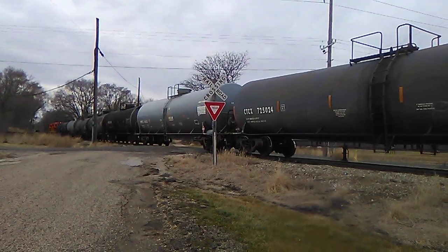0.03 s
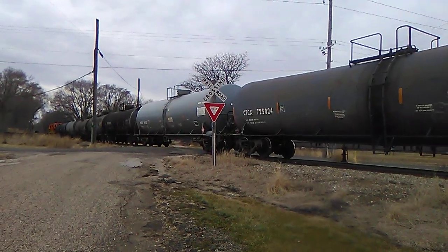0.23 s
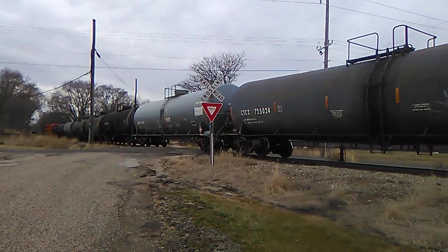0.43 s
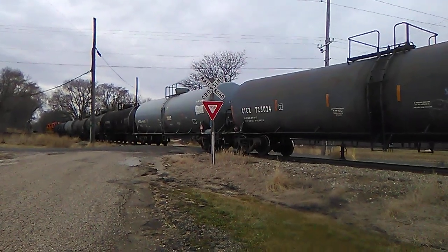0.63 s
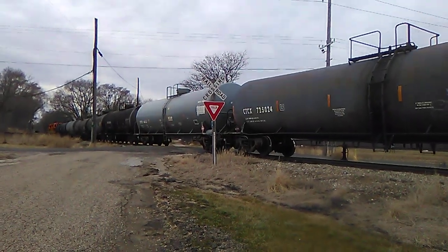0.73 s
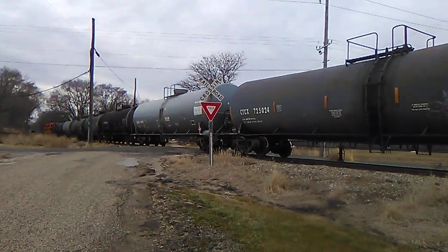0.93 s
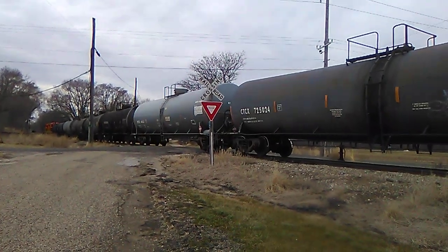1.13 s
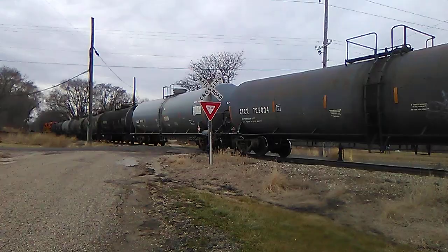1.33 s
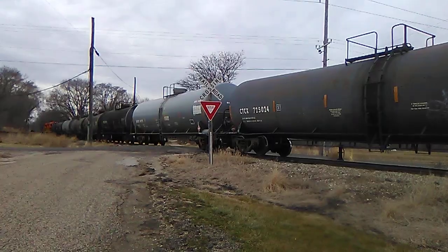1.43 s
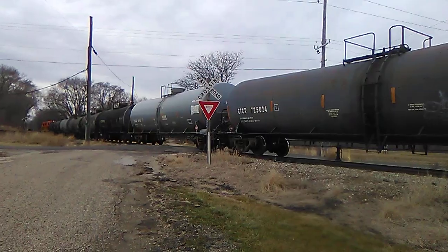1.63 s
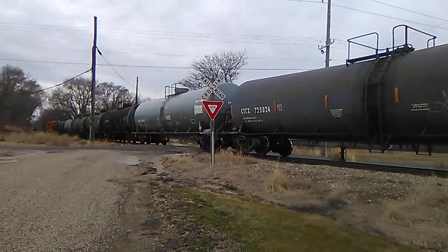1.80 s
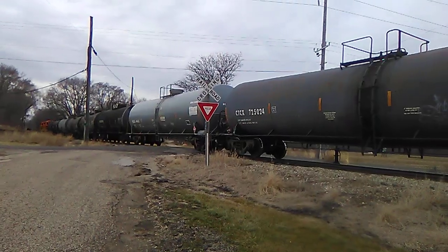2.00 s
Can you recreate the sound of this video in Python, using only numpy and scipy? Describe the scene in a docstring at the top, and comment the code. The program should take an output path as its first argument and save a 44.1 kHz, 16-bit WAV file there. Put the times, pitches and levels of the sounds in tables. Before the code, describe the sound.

Slack runs up a slow train of tank cars. Muffled distant clatter and brief thin squeals give way to dense, bright, ringing coupler crashes nearby, with deep rumble, hollow thuds and wind thumping the left microphone.

```python
"""Wind buffets the left microphone port over a low wheel rumble and brief flange squeals; tank cars roll
slowly over a rural crossing. Then jolted tanks boom, and slack runs up the train: the couplers crash one
after another, mostly nearer and brighter, and the steel rings.
Wind, wheels and crashes are banded noise under envelopes; squeals, booms and ringing are wavering sines."""
import sys
import numpy as np
from scipy import signal
from scipy.io import wavfile
from scipy.ndimage import uniform_filter1d, map_coordinates

SR = 44100
rng = np.random.default_rng(int(sys.argv[2]) if len(sys.argv) > 2 else 0)


def pcm_store(signal):
    """Save signal as 16-bit PCM."""
    levels = np.round(np.clip(np.atleast_2d(signal), -1, 1) * 32767)
    wavfile.write(sys.argv[1], SR, levels.astype(np.int16).T)


N = 90890
TIME = np.arange(N) / SR
EDGES_HZ = np.concatenate([np.geomspace(20, 640, 10, endpoint=False), np.geomspace(640, 15000, 19)])
CENTRES_HZ = np.sqrt(EDGES_HZ[1:] * EDGES_HZ[:-1])


def from_db(db):
    """Amplitude factor of a level in dB."""
    return 10 ** (np.asarray(db) / 20)


def rms_one(x):
    """Scale to rms 1."""
    return x / np.sqrt(np.mean(x ** 2) + 1e-20)


def in_time(rows):
    """Straight lines between (t/s, value) points."""
    return np.interp(TIME, *np.transpose(rows))


def at_hz(points, hz):
    """Read an (f/Hz, value) curve on a log frequency axis."""
    curve_hz, values = np.transpose(points)
    return np.interp(np.log(hz), np.log(curve_hz), values)


def panned(db):
    """Left and right gains of constant power; db is left minus right."""
    pair = from_db(np.array([db / 2, -db / 2]))
    return pair / np.sqrt(np.mean(pair ** 2, axis=0))


def drift(rate_hz):
    """Slow random wander of rms 1: noise through two equal low-pass poles at rate_hz."""
    step = 20  # samples per slow sample
    pole = np.exp(-2 * np.pi * rate_hz * step / SR)
    noise = rng.standard_normal(N // step + 2002)
    slow = signal.lfilter([1], [1, -2 * pole, pole * pole], noise)[2000:]  # drop the settling
    return np.interp(np.arange(N) / step, np.arange(len(slow)), rms_one(slow))


def band_gains(spectrum):
    """Amplitude of each band in a sound of rms 1, from density in dB per Hz."""
    gain = from_db(at_hz(spectrum, CENTRES_HZ)) * np.sqrt(np.diff(EDGES_HZ))
    return gain / np.linalg.norm(gain)


def noise_bands(patchy_db, likeness):
    """Flickering stereo noise, bands x 2 x N; mid and side mix sets left-right correlation."""
    white = rng.standard_normal((2, 2, N))
    bands = []
    for k, hz in enumerate(CENTRES_HZ):
        sos = signal.butter(3, EDGES_HZ[k:k + 2], "band", fs=SR, output="sos")
        mid, side = signal.sosfilt(sos, white[k % 2])
        alike = np.clip(at_hz(likeness, hz), -1, 1)
        stereo = np.sqrt(1 + alike) * mid + np.sqrt(1 - alike) * side * [[1], [-1]]
        bands.append(rms_one(stereo * from_db(patchy_db * drift(6.5))))
    return np.array(bands)


def coloured(spectrum, bands, pan_db=0):
    """Mix the bands to a spectrum and a direction."""
    gains = band_gains(spectrum) * panned(pan_db + 0 * CENTRES_HZ)
    return np.einsum("cb,bcn->cn", gains, bands)


def burst(start_s, rise_s, t60_s):
    """Straight rise, exponential fall."""
    age = TIME - start_s
    return np.clip(age / rise_s, 0, 1) * from_db(-60 * np.maximum(age - rise_s, 0) / t60_s)


# general stereo likeness, also of wheels and far crashes: f/Hz, left-right correlation
LIKENESS = [(280, 0.97), (600, 0.95), (1200, 0.074), (2500, 0.035), (4000, -0.091), (8000, 0.15)]
# wind buffets: centre t/s, half length to 1/e power/s, level before low cut/dB
BUFFETS = [(.01, 0.0092, -5), (0.092, 0.013, -8.5), (0.153, 0.029, -8), (0.232, 0.0058, -6),
           (0.556, 0.0074, -16), (0.774, 0.0085, -14), (0.855, 0.028, -13.5), (1.002, 0.035, -14.5),
           (1.327, 0.024, -10.5), (1.586, 0.0069, -9), (1.724, 0.054, -10.5), (1.905, 0.051, -12.5),
           (2.06, 0.0067, -1.5)]
# wind spectrum before levelling and low cut: f/Hz, relative level/(dB per Hz)
WIND = [(20, -38), (36, 4.5), (52, 6), (75, 11), (115, -5.5), (210, -11), (400, -23.5), (800, -45),
        (14000, -100)]
BREEZE_DB, WIND_LOW_CUT_HZ = -28, 48.5  # breeze level is before the low cut


def wind():
    """Lumps of turbulence at the left microphone port; the right one is sheltered."""
    power = from_db(BREEZE_DB) ** 2
    for centre_s, half_s, db in BUFFETS:
        power = power + from_db(db) ** 2 * np.exp(-((TIME - centre_s) / half_s) ** 2)
    eddies = coloured(WIND, noise_bands(patchy_db=-0.5, likeness=LIKENESS))[0]
    eddies = eddies / np.sqrt(uniform_filter1d(eddies ** 2, size=1500) + 0.0033)  # even out the level
    low_cut = signal.butter(4, WIND_LOW_CUT_HZ, "high", fs=SR, output="sos")
    left = signal.sosfilt(low_cut, np.sqrt(power) * eddies)
    return np.array([left, np.zeros(N)])


# rumble envelope: t/s, level/dB
RUMBLE_LEVEL = [(0, -29.5), (.5, -40), (1.12, -33), (1.2, -29.5), (1.3, -30.5), (1.5, -23), (1.63, -29.5),
                (1.76, -20.5), (1.92, -26.5), (2.06, -21.5)]
# rumble spectrum: f/Hz, relative level/(dB per Hz)
RUMBLE = [(25, -35.5), (50, 8), (75, 6), (130, 4.5), (220, -3.5), (320, -11), (470, -14.5), (600, -38),
          (900, -51.5)]
# steel-on-rail hiss envelope: t/s, level/dB
ROLL_LEVEL = [(0, -51.5), (1.15, -51), (1.4, -36), (1.7, -29.5), (2.06, -29)]
# hiss spectrum: f/Hz, relative level/(dB per Hz)
ROLL = [(300, 0.5), (900, 0), (1200, -2.5), (2100, -0.5), (3400, -10.5), (6000, -12), (9000, -29.5),
        (14000, -63.5)]
# direction of hiss and far crashes: f/Hz, left minus right/dB
FAR_PAN = [(300, 0.5), (1000, -1.5), (2200, -13), (4000, 5), (6000, 4)]
DRONE_HZ, DRONE_WANDER_HZ, DRONE_RE_RUMBLE_DB = 402.3, 11.6, -17.5


def wheels():
    """Surging car rumble with a tank-shell hum, and steel-on-rail hiss swelling as a bogie nears."""
    bands = noise_bands(patchy_db=1.5, likeness=LIKENESS)
    phase = 2 * np.pi * DRONE_HZ * TIME
    hum = drift(DRONE_WANDER_HZ) * np.cos(phase) + drift(DRONE_WANDER_HZ) * np.sin(phase)
    low = coloured(RUMBLE, bands, pan_db=2.5) + from_db(DRONE_RE_RUMBLE_DB) * hum
    rumble = from_db(in_time(RUMBLE_LEVEL)) * low
    hiss = from_db(in_time(ROLL_LEVEL)) * coloured(ROLL, bands, at_hz(FAR_PAN, CENTRES_HZ))
    return rumble + hiss


# wheel squeals: t/s, length/s, start f/Hz, glide/(Hz per s), wander rate/Hz, start level before flutter/dB,
# left minus right/dB
SQUEALS = [(-.03, 0.27, 5950, -13, 170, -47.5, 34), (0.409, 0.05, 4210, -8000, 300, -53.5, 12),
           (0.594, 0.22, 1570, -260, 50, -51, -5.5), (0.883, 0.26, 5560, 0, 130, -59, 17),
           (1.338, 0.05, 6760, 11, 34.8, -32.5, -9), (1.698, 0.058, 949, -2800, 30, -22.5, -2),
           (1.815, 0.05, 7140, -3.5, 40, -30, 10)]
SQUEAL_RISE_S, SQUEAL_FALL_S = 0.004, 0.015
SQUEAL_FADE_DB, SQUEAL_FLUTTER_DB = -6.5, 4  # fade over the whole length; flutter rms
CHATTER_RADIANS = .9  # rms phase wander of squeals and ringing


def squeals():
    """Flanges rub and a wheel mode sings with an unsteady pitch, fading as it goes."""
    out = 0
    for start_s, length_s, hz, glide, wander_hz, db, pan_db in SQUEALS:
        age = np.clip(TIME - start_s, 0, length_s)
        gate = np.clip(np.minimum(age / SQUEAL_RISE_S, (length_s - age) / SQUEAL_FALL_S), 0, 1)
        phase = 2 * np.pi * np.cumsum(hz + glide * age) / SR + CHATTER_RADIANS * drift(wander_hz)
        tone = np.sqrt(2) * np.sin(phase) * from_db(SQUEAL_FLUTTER_DB * drift(wander_hz))
        level = from_db(db + SQUEAL_FADE_DB * age / length_s)
        out = out + level * gate * tone * panned(pan_db)[:, None]
    return out


# thuds of lurching cars: t/s, level/dB, start f/Hz, left minus right/dB
THUDS = [(0.346, -24, 81.4, -25), (0.635, -27, 161.1, 16), (1.18, -22.5, 141.4, -2),
         (1.322, -19.5, 181.3, 7), (1.448, -20, 271, 3.5), (1.7, -20.5, 234.4, -1)]
THUD_RISE_S, THUD_T60_S = 0.006, 0.42
THUD_WANDER_HZ, THUD_SAG_OCT_PER_S = 13.7, 7


def thuds():
    """A jolted tank booms briefly, its unsteady pitch sliding down as it settles."""
    out = 0
    for start_s, db, hz, pan_db in THUDS:
        pitch_hz = hz * 2 ** (-THUD_SAG_OCT_PER_S * np.maximum(TIME - start_s, 0))
        phase = 2 * np.pi * np.cumsum(pitch_hz) / SR + drift(THUD_WANDER_HZ)
        boom = burst(start_s, THUD_RISE_S, THUD_T60_S) * np.sqrt(2) * np.sin(phase)
        out = out + from_db(db) * boom * panned(pan_db)[:, None]
    return out


# coupler crashes: t/s, level at 2 kHz tilt pivot/dB, rise/s, t60/s, nearness 0-1, tilt/(dB per octave),
# lower ring f/Hz, upper ring f/Hz
CRASHES = [(0.481, -37.5, 0.054, 0.67, 0.03, -1, 2840, 5600),
           (0.888, -39, 0.022, 0.73, 0.05, -3.5, 945, 1570), (1.097, -40.5, 0.017, 1, 0, 1, 2250, 3700),
           (1.167, -25, 0.032, 0.57, 0.05, -0.5, 1000, 2380),
           (1.326, -25.5, 0.017, 0.96, 0.04, 0, 838, 7150),
           (1.426, -19, 0.042, 0.75, 0.1, -0.5, 1570, 1860),
           (1.593, -24.5, 0.035, 0.16, 0.58, -1, 2250, 3682), (1.689, -20, 0.025, 1, 0.08, 0, 832, 1570),
           (1.744, -10.5, 0.027, 0.33, 0.88, 1.2, 1814, 3780),
           (1.896, -15, 0.0063, 0.26, 1, 2.3, 2380, 5545), (1.963, -16.5, 0.0018, 0.22, 1, 2.5, 1887, 4900),
           (1.981, -17, 0.0032, 0.21, 1, 2, 3300, 5440), (2.029, -19, 0.02, 0.36, 0.74, -0.5, 3280, 7150)]


def crash_shapes():
    """One envelope for each crash."""
    return np.array([burst(start_s, rise_s, t60_s) for start_s, _, rise_s, t60_s, *_ in CRASHES])


# crash spectra before tilt: f/Hz, relative level/(dB per Hz)
FAR_CRASH = [(150, -1.5), (250, -1), (400, -0.5), (620, -20), (950, -3), (1220, -11.5), (1750, -9.5),
             (2600, -11), (4700, -17), (6000, -14), (8500, -27.5), (11000, -57)]
NEAR_CRASH = [(150, -10), (300, 0.5), (800, 1.5), (1230, -12), (1900, -2.5), (2350, -2), (2850, -4),
              (3500, -7), (4400, -11.5), (5600, -9.5), (8300, -20), (10300, -33.5), (14000, -42.5)]
# direction of near crashes and ringing: f/Hz, left minus right/dB
NEAR_PAN = [(300, -4.5), (1000, 1.5), (2200, -5), (4000, 4), (6500, 11.5), (12000, 5.5)]
# near-crash stereo likeness: f/Hz, left-right correlation before the lag
NEAR_LIKENESS = [(300, 0.95), (750, 0.96), (1500, 1), (2500, 0.64), (6000, 0.36)]
NEAR_LAG_S = .00056  # a near crash reaches the right port later
CRASH_PATCHY_DB, RATTLE_DB, RATTLE_HZ = 1.2, 0.48, 224


def crashes():
    """Each crash is a dense rattle that dies away; nearness sets its colour and direction."""
    _, db, _, _, near, tilt, *_ = np.transpose(CRASHES)
    near = np.clip(near, 0, 1)
    shapes = crash_shapes()

    def rattle(share, spectrum, pan, likeness):
        """Add the powers of all crashes band by band."""
        gains = band_gains(spectrum) * panned(at_hz(pan, CENTRES_HZ))
        bands = noise_bands(CRASH_PATCHY_DB, likeness) * gains.T[:, :, None]
        out = 0
        for band, hz in zip(bands, CENTRES_HZ):
            powers = share * from_db(db + tilt * np.log2(hz / 2000)) ** 2
            out = out + band * np.sqrt(powers @ shapes ** 2)
        return out

    left, right = rattle(near, NEAR_CRASH, NEAR_PAN, NEAR_LIKENESS)
    late_right = np.roll(right, int(NEAR_LAG_S * SR)) * (TIME > NEAR_LAG_S)
    far = rattle(1 - near, FAR_CRASH, FAR_PAN, LIKENESS)
    return (np.array([left, late_right]) + far) * from_db(RATTLE_DB * drift(RATTLE_HZ))


ECHO_S, ECHO_SHARE, ECHO_WANDER_S = (.0023, .0041, .0067), .31, .00006  # nominal delays


def among_cars(x):
    """Short echoes off the moving tanks and frames comb the noise into drifting metallic partials."""
    echoes = 0
    for delay_s in ECHO_S:
        then_s = TIME - delay_s * rng.uniform(.8, 1.2) - ECHO_WANDER_S * drift(2)
        echoes = echoes + np.array([map_coordinates(side, [then_s * SR]) for side in x])
    return (x + ECHO_SHARE * echoes) / np.sqrt(1 + len(ECHO_S) * ECHO_SHARE ** 2)


# modes of couplers and car frames: f/Hz, relative level/dB
STEEL_MODES = [(832, -4), (977, -3), (1570, -3), (1840, 0), (1892, -1), (2250, -6), (2380, -5), (2840, -3),
               (3541, -5), (3682, -3), (4897, -6), (5367, -6), (5545, -4), (7150, -7), (7880, -4),
               (12070, -14)]
STEEL_DB, STEEL_FAR_DB, AIR_DB_PER_HZ = -1.5, -7.5, -.001  # distance dulls the highest modes most
OFF_PITCH_DB, RING_FOCUS_OCT = -15, .04
CHATTER_HZ, CHATTER_DB = 34, 3


def ringing_steel():
    """Each crash rings the modes, most of all near its two pitches; chatter sways strength and phase."""
    _, db, _, _, near, _, *ring_hz = np.transpose(CRASHES)
    shapes = crash_shapes()
    out = 0
    for hz, mode_db in STEEL_MODES:
        octaves_off = np.log2(hz / np.array(ring_hz))
        off_pitch = 1 - np.exp(-(octaves_off / RING_FOCUS_OCT) ** 2).max(axis=0)
        distance_db = (STEEL_FAR_DB + AIR_DB_PER_HZ * hz) * (1 - near)
        strengths = from_db(STEEL_DB + mode_db + db + distance_db + OFF_PITCH_DB * off_pitch)
        envelope = np.sqrt(strengths ** 2 @ shapes ** 2) * from_db(CHATTER_DB * drift(CHATTER_HZ))
        turns = hz * TIME + rng.random((2, 1)) / 3  # sides start up to a third of a cycle apart
        phase = 2 * np.pi * turns + CHATTER_RADIANS * drift(CHATTER_HZ)
        out = out + envelope * np.sin(phase) * panned(at_hz(NEAR_PAN, hz))[:, None]
    return out


def scene():
    """Sum of all sources; only the crash noise echoes among the cars."""
    return wind() + wheels() + squeals() + thuds() + among_cars(crashes()) + ringing_steel()


CUTOFF_HZ = 14500


def record(dry):
    """The highest peaks are rounded, the top is cut."""
    rounded = dry / (1 + dry ** 6) ** (1 / 6)
    return signal.sosfilt(signal.ellip(10, .1, 80, CUTOFF_HZ, fs=SR, output="sos"), rounded)


dry = scene()
out = record(dry)
pcm_store(out)
```